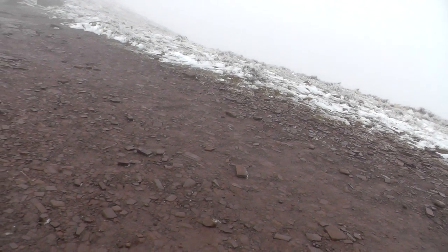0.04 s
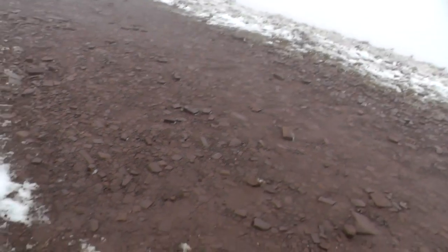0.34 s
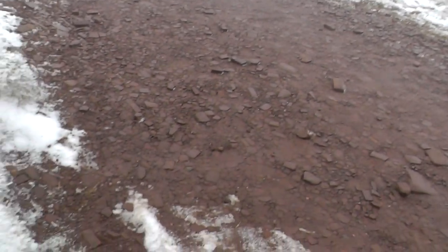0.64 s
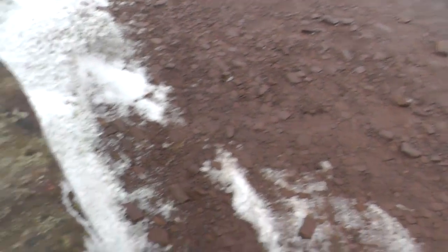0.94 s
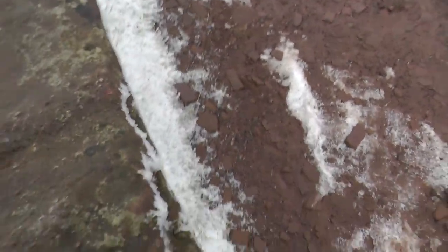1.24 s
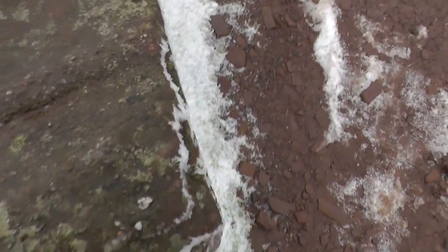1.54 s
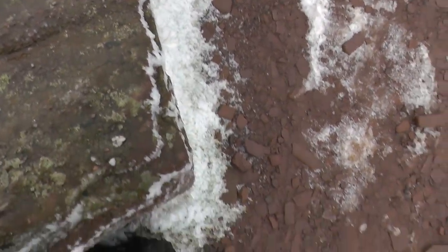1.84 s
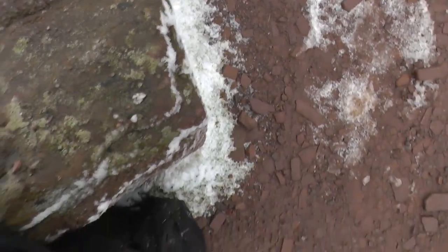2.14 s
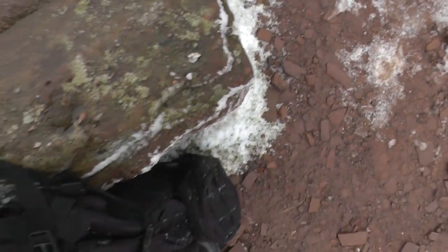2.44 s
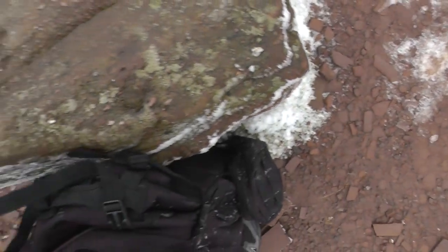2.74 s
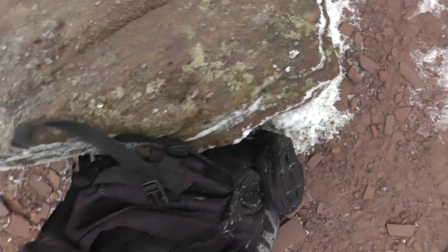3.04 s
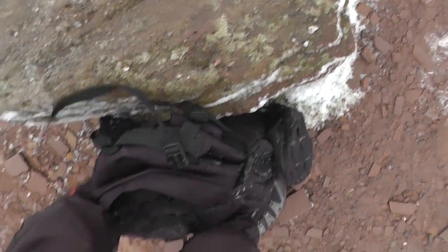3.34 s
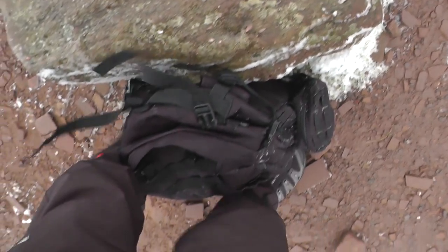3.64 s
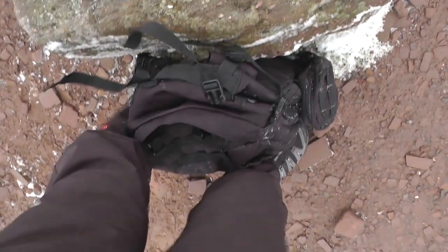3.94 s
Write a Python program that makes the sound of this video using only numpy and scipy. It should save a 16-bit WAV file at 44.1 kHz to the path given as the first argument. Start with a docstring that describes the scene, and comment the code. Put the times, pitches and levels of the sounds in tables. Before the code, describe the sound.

Wind rumbles and beats on the microphone in uneven gusts on an open hillside.

```python
"""Strong wind beats on the two ports of a hand-held microphone on an open hillside.
Big eddies rumble in both ports alike; smaller ones buffet mainly the right port and push the two
in opposition. Each gust tears into a fluttering hiss that brightens with its strength.
Eddies breaking on a port throw off tiny snaps. A faint, even rush from the slope lies underneath."""
import sys
import numpy as np
from scipy import signal
from scipy.fft import rfft, irfft
from scipy.io import wavfile

SR = 44100
rng = np.random.default_rng(int(sys.argv[2]) if len(sys.argv) > 2 else 0)


def inscribe(sig):
    """Save sig as 16-bit PCM at rate SR to the path in sys.argv[1].

    A 1-D sig is mono; a 2-D sig holds one channel per row.
    Samples are clipped to [-1, 1] before scaling.
    """
    pcm = np.round(np.clip(np.atleast_2d(sig).T, -1, 1) * 32767)
    wavfile.write(sys.argv[1], SR, pcm.astype(np.int16))


N = 176400


def undb(db):
    """Decibels to gain."""
    return 10 ** (np.asarray(db) / 20)


def unit(x):
    """Scale to rms 1."""
    return x / np.sqrt(np.mean(x ** 2))


def over_hz(table, hz, column=1):
    """A table column, interpolated over log frequency."""
    rows = np.array(table, float)
    return np.interp(np.log(np.maximum(hz, 1)), np.log(rows[:, 0]), rows[:, column])


def over_time(table, column=1):
    """A level column at every sample, in dB about its mean."""
    rows = np.array(table, float)
    db = np.interp(np.arange(N) / SR, rows[:, 0], rows[:, column])
    return db - db.mean()


def wander(per_s, limit=1.77):
    """Smooth random curve, rms near 1, soft-limited, changing about per_s times a second."""
    hz = np.fft.rfftfreq(N, 1 / SR)
    spectrum = rfft(rng.standard_normal(N)) / (1 + (2 * hz / per_s) ** 4)
    return limit * np.tanh(unit(irfft(spectrum, N)) / limit)


# Each row: time in seconds, relative rumble level in dB, relative hollow roar level in dB.
BIG_EDDIES = [(0.01, -21, -22.5), (0.09, -21.5, -28.5), (0.19, -34.5, -24.5), (0.22, -26, -24.5),
              (0.35, -28, -28.5), (0.39, -30.5, -20.5), (0.47, -35.5, -21.5), (0.51, -27.5, -20.5),
              (0.79, -20, -27), (0.81, -34, -21.5), (0.83, -21.5, -25), (0.95, -31.5, -26.5),
              (1.05, -24, -26), (1.07, -34, -33.5), (1.16, -15, -23.5), (1.23, -27, -24.5),
              (1.48, -25, -23), (1.64, -27, -26.5), (1.67, -20, -20), (1.69, -34, -27), (1.73, -21.5, -24),
              (2.03, -22, -25), (2.07, -26, -31.5), (2.18, -27.5, -20.5), (2.24, -27.5, -25),
              (2.27, -24.5, -24.5), (2.44, -28, -23.5), (2.5, -23, -28), (2.6, -19.5, -20),
              (2.65, -28, -25.5), (2.77, -24.5, -23), (3.0, -22.5, -26), (3.1, -27.5, -28.5),
              (3.21, -16.5, -20), (3.27, -21, -24.5), (3.89, -21, -23), (3.96, -19, -22),
              (3.99, -16.5, -21)]
# Each row: time in seconds, relative buffet level in dB, relative hiss level in dB.
SMALL_EDDIES = np.vstack([ [(0.012, -20, -45.5), (0.028, -27, -52), (0.108, -19.5, -46), (0.18, -32, -60),
                (0.202, -43, -57.5), (0.216, -25, -49), (0.254, -37, -65), (0.272, -28, -51.5),
                (0.294, -31.5, -67), (0.308, -44, -64), (0.374, -25.5, -53.5), (0.488, -37, -62),
                (0.506, -28, -55), (0.52, -25.5, -53), (0.542, -32, -63.5), (0.552, -30, -55),
                (0.66, -24, -48.5), (0.704, -31, -63.5), (0.71, -25, -49), (0.768, -24.5, -48.5),
                (0.814, -27, -56.5), (0.822, -25, -46), (0.9, -28, -47.5), (0.912, -38, -70.5),
                (0.922, -27.5, -51.5), (0.968, -33, -64.5), (0.972, -41, -66.5), (1.022, -28.5, -54),
                (1.03, -35, -68.5), (1.038, -23, -57), (1.062, -44.5, -69.5), (1.098, -45.5, -68),
                (1.148, -25.5, -54.5), (1.184, -45, -62.5), (1.192, -28.5, -53.5), (1.216, -34.5, -58),
                (1.246, -25.5, -56), (1.3, -29, -55)], [(1.31, -45.5, -71.5), (1.328, -41.5, -69),
                (1.346, -21.5, -51), (1.358, -48.5, -69.5), (1.388, -37.5, -71), (1.4, -29.5, -45.5),
                (1.422, -46, -70.5), (1.43, -23.5, -55), (1.438, -32, -58), (1.51, -25.5, -50.5),
                (1.586, -33.5, -56.5), (1.608, -24, -50.5), (1.646, -46, -71.5), (1.654, -28, -57),
                (1.666, -45.5, -49.5), (1.672, -26.5, -54.5), (1.702, -30.5, -55.5), (1.722, -28, -49.5),
                (1.874, -23, -45.5), (1.884, -29.5, -53), (1.96, -24, -45.5), (1.972, -28, -54.5),
                (2.01, -28.5, -44.5), (2.082, -32.5, -57), (2.096, -27.5, -54.5), (2.15, -34, -51),
                (2.18, -25, -49.5), (2.214, -33, -52.5), (2.378, -27.5, -50.5), (2.408, -44, -65),
                (2.418, -31, -56), (2.476, -41.5, -66), (2.522, -43, -68), (2.548, -27, -45.5),
                (2.578, -35, -59.5), (2.598, -28, -46), (2.634, -28.5, -51), (2.67, -45.5, -70.5)],
                [(2.68, -27, -52.5), (2.716, -35.5, -56), (2.756, -25.5, -48), (2.788, -42, -70),
                (2.824, -43, -58.5), (2.836, -21, -47), (2.918, -35, -53.5), (2.926, -42.5, -67),
                (2.98, -23.5, -51), (3.028, -24.5, -50), (3.054, -42, -68), (3.072, -31, -49.5),
                (3.096, -39, -68), (3.122, -30.5, -64), (3.13, -32.5, -54.5), (3.154, -43, -68),
                (3.17, -33, -66), (3.224, -45, -57.5), (3.252, -27.5, -49), (3.286, -44, -67.5),
                (3.366, -46.5, -69.5), (3.438, -34.5, -57.5), (3.496, -42.5, -68.5), (3.514, -33.5, -52.5),
                (3.522, -36.5, -70), (3.558, -29.5, -43), (3.566, -36.5, -56.5), (3.7, -30, -55.5),
                (3.714, -44.5, -69), (3.768, -34, -54), (3.78, -34.5, -69.5), (3.806, -47.5, -60.5),
                (3.826, -24, -55), (3.848, -34, -68.5), (3.87, -42.5, -58.5), (3.888, -21, -44.5),
                (3.914, -41, -60.5), (3.985, -34, -54.5)], ])
# Each row: frequency in Hz, response in dB per dB of gust, flutter depth in dB, tear depth in dB.
EDDY_RESPONSE = [(100, 0.65, 1.75, 0.2), (400, 1.3, 1.17, 1.04), (744, 0.83, 1.35, 2.4), (1350, 0.88, 2, 4),
                 (2480, 0.5, 1.9, 3.5), (5500, 0.58, 1.5, 3), (11000, 1, 3.2, 5)]
RUMBLE_HZ, ROAR_HZ, BUFFET_HZ, HISS_HZ = 180, 367, 680, 2180
FLUTTER_PER_S, TEAR_PER_S, SNAP_HIGHPASS_HZ = 110, 510, 2000


def turbulence(hz):
    """Spectra of two flows that gust, flutter and snap together but tear independently."""
    rumble_db, roar_db = over_time(BIG_EDDIES), over_time(BIG_EDDIES, column=2)
    buffet_db, hiss_db = over_time(SMALL_EDDIES), over_time(SMALL_EDDIES, column=2)
    curves_db = np.array([rumble_db, roar_db, buffet_db, hiss_db])
    curves_log_hz = np.log([RUMBLE_HZ, ROAR_HZ, BUFFET_HZ, HISS_HZ])
    flutter = wander(FLUTTER_PER_S)
    tear = np.array([wander(TEAR_PER_S), wander(TEAR_PER_S)])
    air = rng.standard_normal((2, N))
    spikes = snaps()
    octave = np.log2(np.maximum(hz, 1))
    flows = 0
    for centre_hz in 2 ** np.arange(4.5, 14.5, .5):  # half-octave bands
        crossfade = [np.interp(np.log(centre_hz), curves_log_hz, row) for row in np.eye(4)]
        gust_db = over_hz(EDDY_RESPONSE, centre_hz) * np.dot(crossfade, curves_db)
        flutter_db = over_hz(EDDY_RESPONSE, centre_hz, column=2) * flutter
        tear_db = over_hz(EDDY_RESPONSE, centre_hz, column=3) * tear
        force = unit(undb(gust_db + flutter_db + tear_db))
        snap_gain = centre_hz / (centre_hz + SNAP_HIGHPASS_HZ)
        band = np.maximum(1 - 2 * abs(octave - np.log2(centre_hz)), 0)
        flows = flows + band * rfft(force * air + snap_gain * spikes)
    return flows


# Each row: frequency in Hz, relative pressure density at the right port in dB.
PORT_DB = [(22, -31), (42, -21), (65, -10.5), (105, -1.5), (180, 0.0), (270, -1.6), (550, -2), (1000, -9.5),
           (1400, -19.5), (2000, -33), (3000, -39.5), (4000, -46), (5600, -46.3), (8500, -55.5),
           (11500, -67), (15500, -82)]
# Each row: frequency in Hz, coherence of the ports from 0 to 1.
COHERENCE = [(100, 0.96), (270, 0.94), (450, 0.76), (620, 0.3), (900, .84), (1400, .87), (3000, .69),
             (5500, 0.95), (9000, .78), (13000, 0.4)]
# Each row: frequency in Hz, phase lead of the left port in radians.
LEFT_LEAD_RAD = [(100, 0.11), (300, 0.11), (480, 1.36), (700, 2.26), (1100, 3.03), (2500, 2), (3800, .7),
                 (5500, .3), (8500, 0.84), (12000, 2.2)]
# Each row: frequency in Hz, left level against right in dB.
LEFT_GAIN_DB = [(60, -2), (110, -1.0), (200, -1.5), (380, -4), (700, -9), (1290, -5.5), (2380, -3.5),
                (4400, -3), (8120, -1), (15000, 3.5)]
# Each row: time in seconds, relative level of the left port's veer band in dB.
VEER_DB = [(0.0, -2.5), (0.13, -2.5), (0.18, -3), (0.8, 0), (1.17, -6.5), (1.88, -3), (2.44, -6.5),
           (2.48, -1), (2.54, -8), (2.82, -4), (3.84, -2), (4.0, -5)]
VEER_HZ, VEER_SIGMA_OCTAVES, RIGHT_RMS_DB = 690, 0.76, -16


def wind_on_ports(hz):
    """The ports colour the flow. The left shares part, phase-shifted; veering varies its shelter."""
    right, independent = turbulence(hz) * undb(over_hz(PORT_DB, hz))
    coherence = over_hz(COHERENCE, hz)
    shared = coherence * np.exp(1j * over_hz(LEFT_LEAD_RAD, hz)) * right
    left = undb(over_hz(LEFT_GAIN_DB, hz)) * (shared + np.sqrt(1 - coherence ** 2) * independent)
    offset_octaves = np.log2(np.maximum(hz, 1) / VEER_HZ)
    veer_band = left * np.exp(-.5 * (offset_octaves / VEER_SIGMA_OCTAVES) ** 2)
    exposure = unit(undb(over_time(VEER_DB)))
    left_wave = irfft(left - veer_band, N) + exposure * irfft(veer_band, N)
    right_wave = irfft(right, N)
    return undb(RIGHT_RMS_DB) * np.array([left_wave, right_wave]) / np.std(right_wave)


# Each row: frequency in Hz, relative spectral density in dB.
SLOPE_DB = [(200, -7), (800, 5.5), (2500, -4.5), (6000, -11.5), (9000, -17), (12000, -32), (15000, -33)]
SLOPE_RMS_DB = -60.5


def wind_on_slope(hz):
    """Even rush of distant wind over the slope."""
    spectrum = rfft(rng.standard_normal((2, N))) * undb(over_hz(SLOPE_DB, hz))
    return undb(SLOPE_RMS_DB) * unit(irfft(spectrum, N))


# Each row: start in seconds, relative level in dB.
EDDY_BREAKS = [(0.081, -39.5), (0.268, -33), (0.643, -32), (0.6817, -47), (0.849, -34.5), (0.892, -39.5),
               (2.0004, -33.5), (2.547, -45), (3.886, -42)]
SNAP_GAIN_DB, SNAP_DECAY_S = 48.5, .0014


def snaps():
    """Brief pressure spikes where an eddy breaks on the rim of a port."""
    t = np.arange(N) / SR
    envelope = np.zeros(N)
    for start_s, level_db in EDDY_BREAKS:
        decay = (t >= start_s) * np.exp(-abs(t - start_s) / SNAP_DECAY_S)
        envelope += undb(level_db + SNAP_GAIN_DB) * decay
    return envelope * rng.standard_normal((2, N))


def scene():
    """Wind on the microphone over wind on the hill."""
    hz = np.fft.rfftfreq(N, 1 / SR)
    return wind_on_ports(hz) + wind_on_slope(hz)


def record(dry, cutoff_hz=15800):
    """The recorder's steep low-pass."""
    return signal.sosfilt(signal.ellip(8, .2, 70, cutoff_hz, fs=SR, output="sos"), dry)


dry = scene()
out = record(dry)
inscribe(out)
```